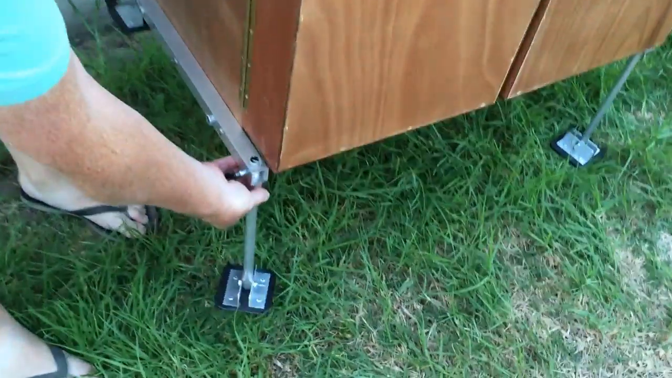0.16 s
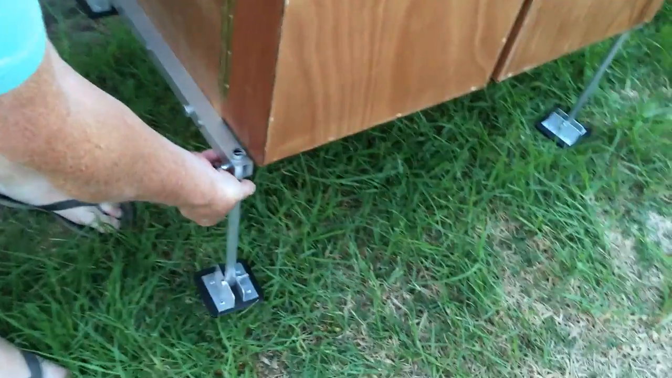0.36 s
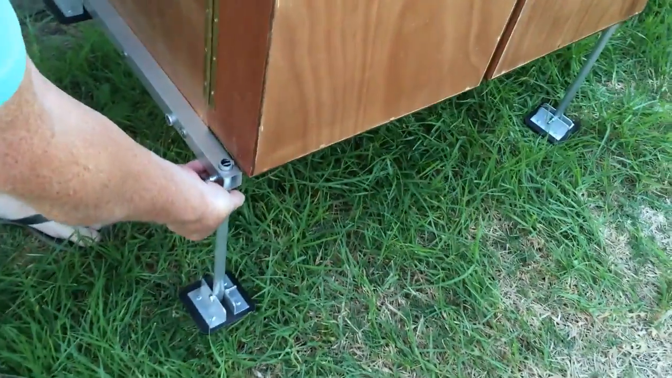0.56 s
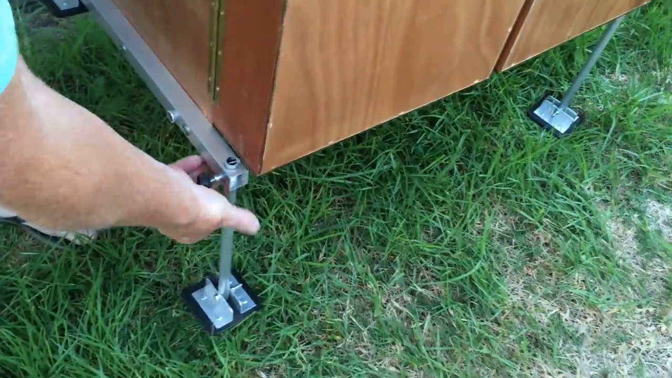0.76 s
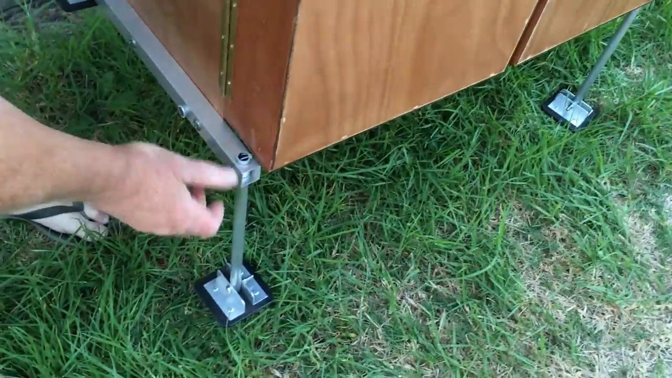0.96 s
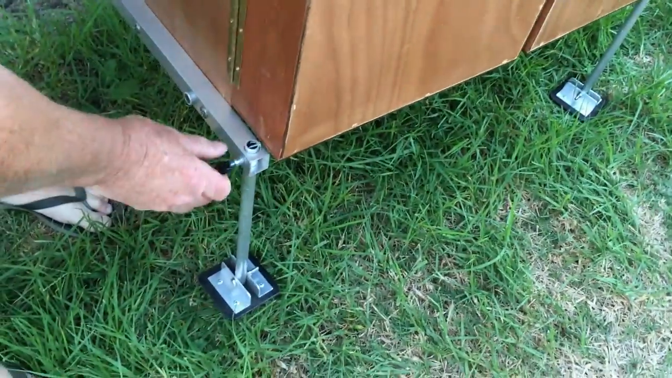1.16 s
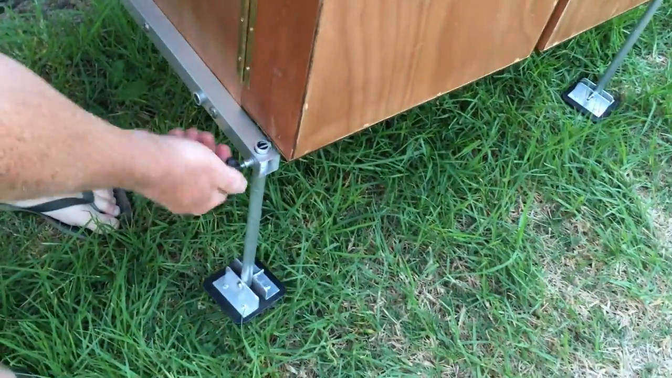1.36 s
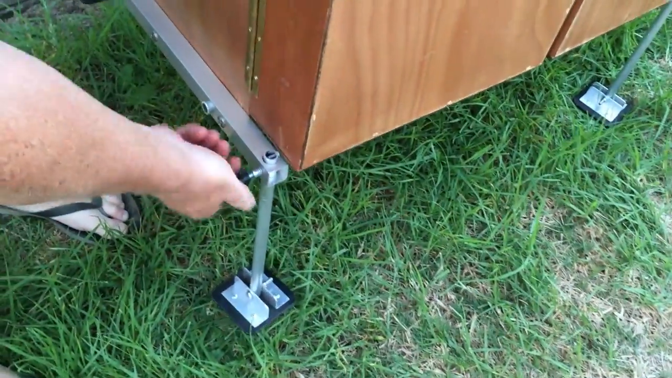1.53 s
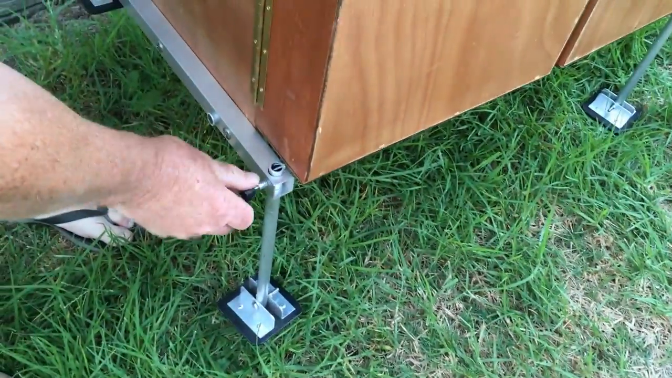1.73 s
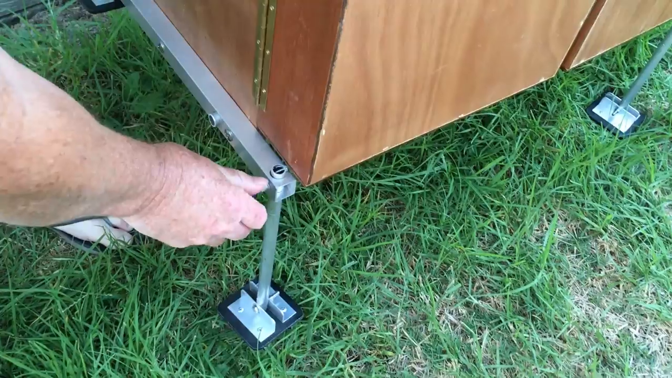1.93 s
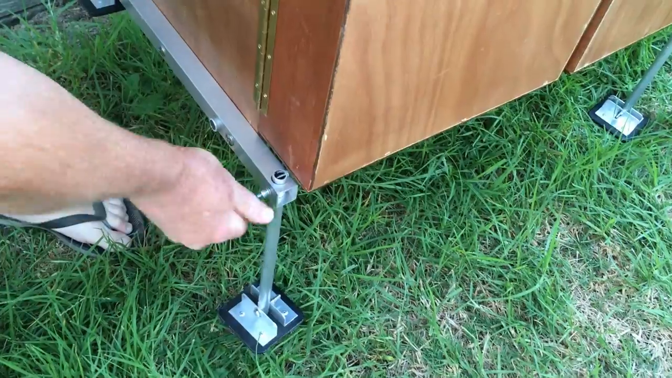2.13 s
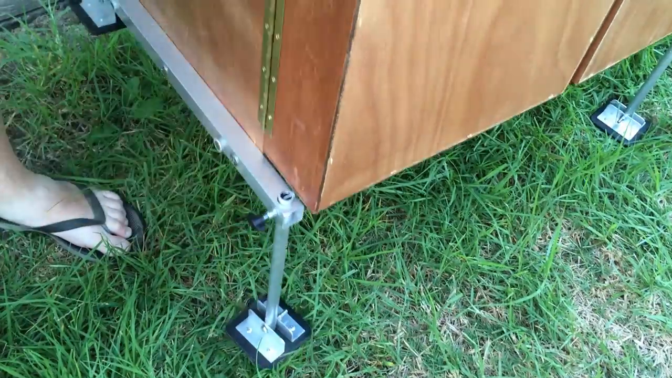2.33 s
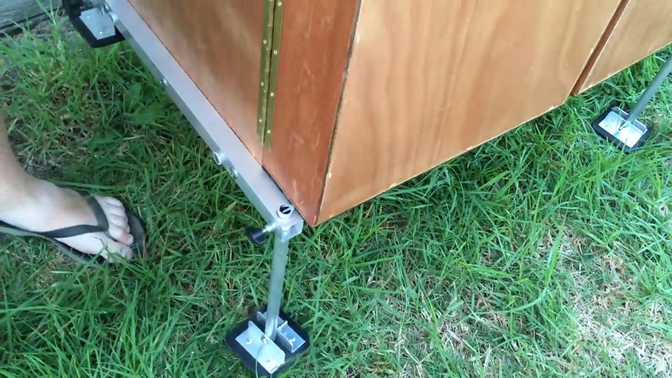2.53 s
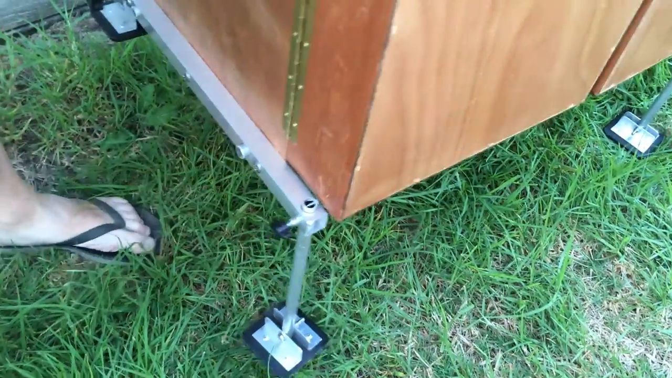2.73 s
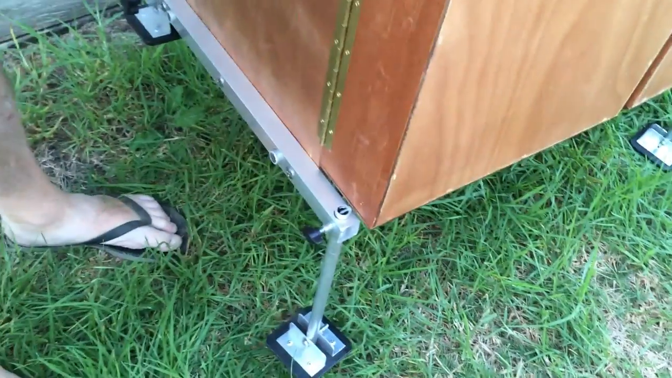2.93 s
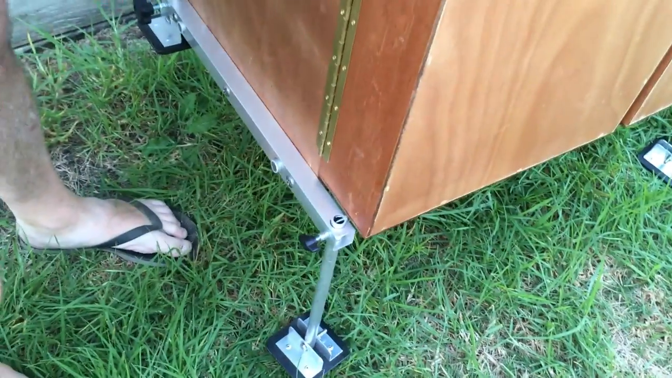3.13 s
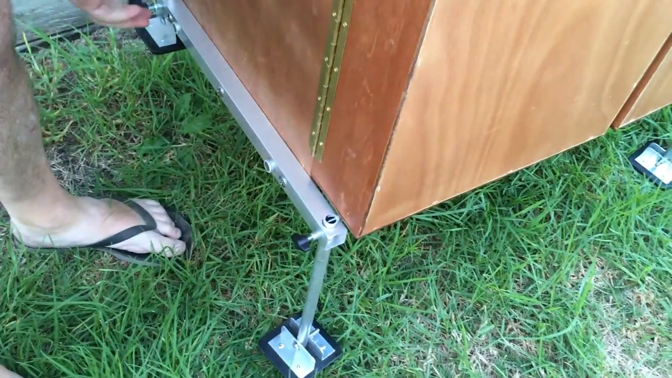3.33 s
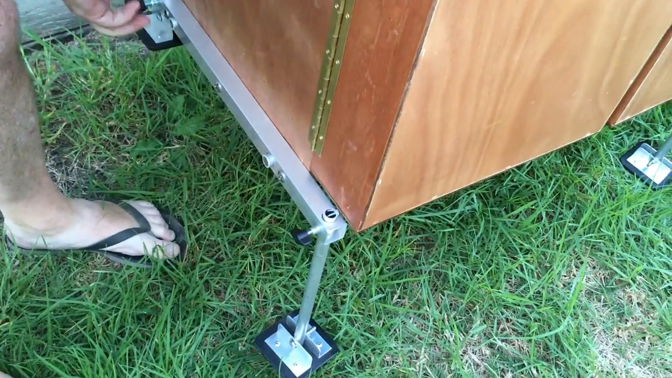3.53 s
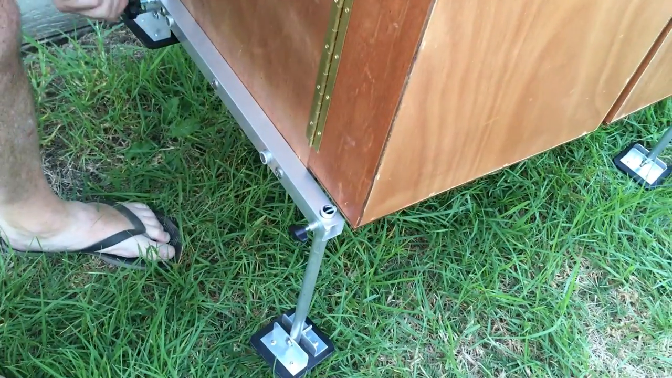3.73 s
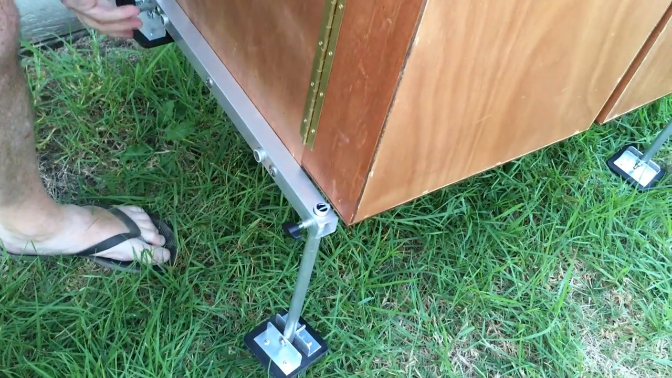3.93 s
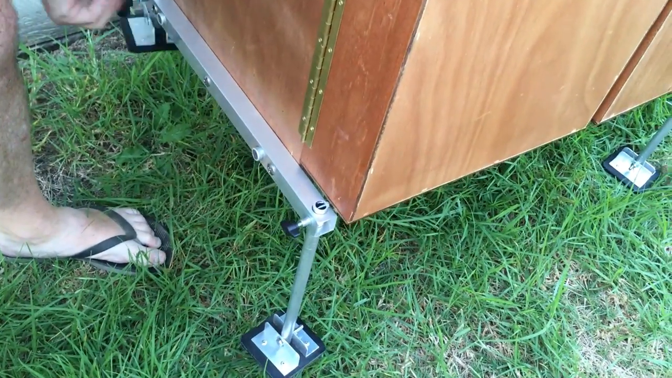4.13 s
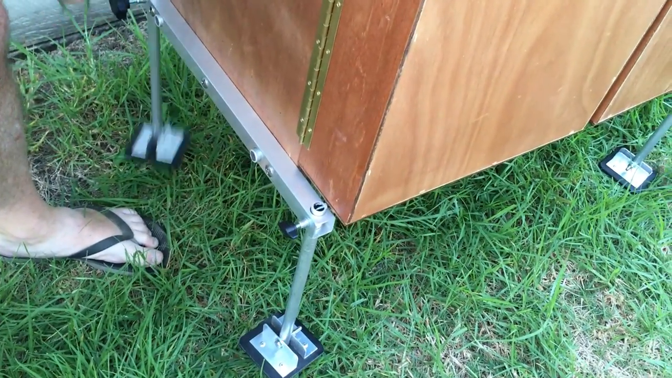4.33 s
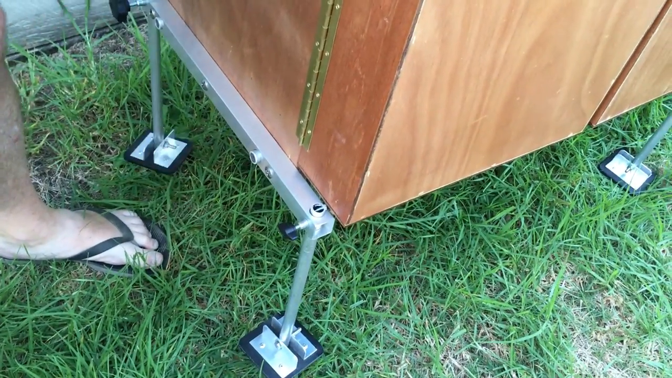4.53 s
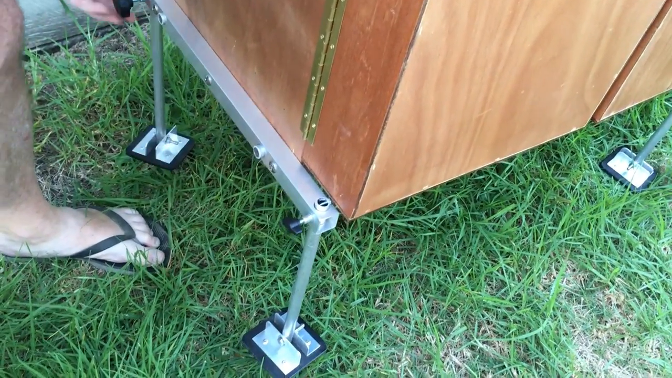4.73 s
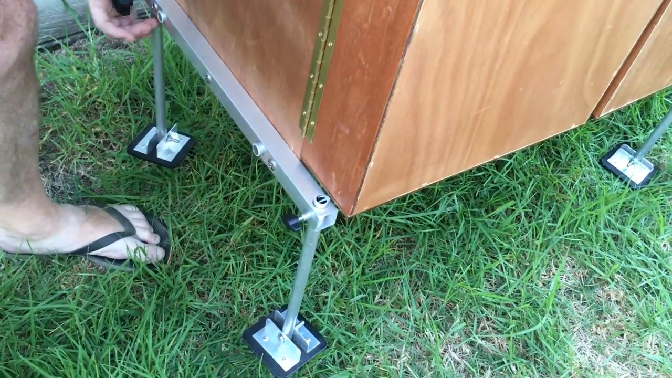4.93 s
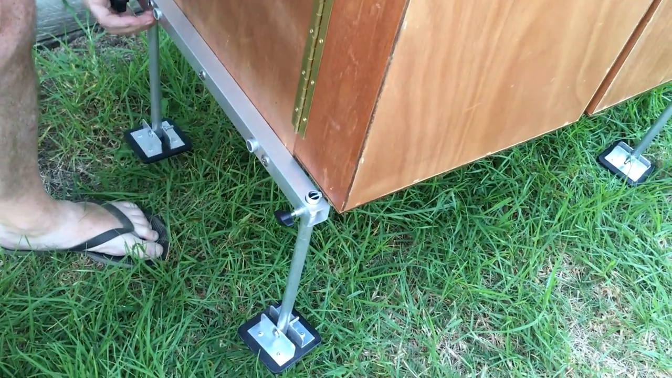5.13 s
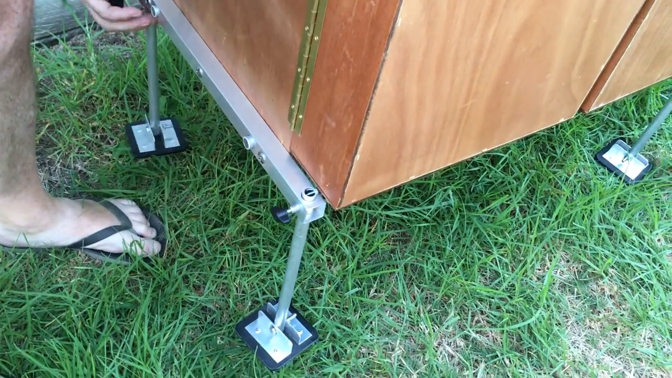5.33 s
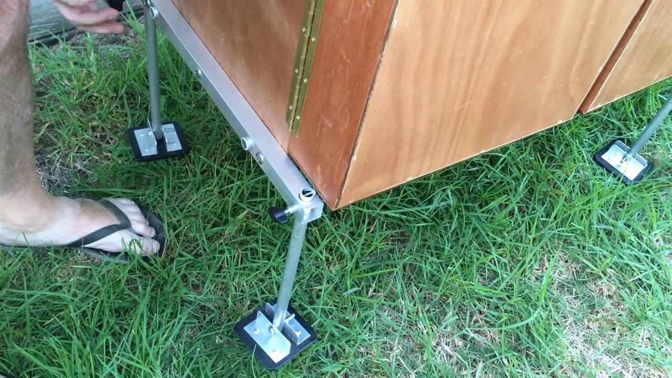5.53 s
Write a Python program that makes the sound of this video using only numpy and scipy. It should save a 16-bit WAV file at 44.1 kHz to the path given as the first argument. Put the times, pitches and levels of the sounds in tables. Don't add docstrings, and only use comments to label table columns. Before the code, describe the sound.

Someone unfolds metal legs under a wooden cabinet outdoors. Soft sandal steps, brushing grass and sparse sharp clicks come first, with thin insects and far birds barely audible. Clicks grow busier in the middle, then a leg is released, scrapes along its sleeve and hits its stop with by far the loudest clack, followed by a fast clatter and quiet handling knocks. Close, dry, mono phone sound.

```python
import sys
import numpy as np
from scipy import signal
from scipy.fft import rfft, irfft, next_fast_len
from scipy.io import wavfile
from scipy.ndimage import uniform_filter1d

SR = 44100
rng = np.random.default_rng(int(sys.argv[2]) if len(sys.argv) > 2 else 0)


def invert_db(level):
    return 10 ** (np.asarray(level, dtype=float) / 20)


def generate_wav(signal):
    frames = np.transpose(np.atleast_2d(signal))
    scaled = np.clip(frames, -1, 1) * 32767
    pcm = np.round(scaled).astype(np.int16)
    wavfile.write(sys.argv[1], SR, pcm)


N = 250488
TAIL = 5400
TOP_HZ = 15850
RELEASE_S, SLAM_S = 4.1, 4.4

# pitch_hz, level_db
RUMBLE_SPECTRUM = [(18, -14), (35, -3), (65, 1.5), (110, -7), (200, -19), (400, -42.5)]
# time_s, level_db
BREEZE = [(0.0, -63), (0.14, -63), (0.58, -56), (1.04, -58), (1.55, -53), (2.28, -62), (2.74, -55),
          (3.19, -61), (4.03, -63), (4.43, -57), (4.76, -65), (5.68, -67)]
# middle_s, half_length_s, level_db
JOLTS = [(.22, .025, -50), (.5, .06, -55), (.79, .045, -47), (1.04, .03, -56), (1.22, .03, -51),
         (1.42, .04, -47), (1.7, .05, -52), (2.25, .025, -39), (2.42, .08, -55), (2.79, .025, -47),
         (3.14, .05, -58), (4.44, .05, -45), (4.56, .03, -50), (5.18, .03, -52), (5.43, .02, -58)]
# pitch_hz, level_db
HISS_SPECTRUM = [(350, -40.5), (600, -24), (1230, -6), (1450, -9), (3780, -9), (4980, -12.5), (7110, -11),
                 (16000, -13.5)]
HISS_DB = -64
# pitch_hz, width_hz, level_db
INSECTS = [(3800, 250, -84), (7200, 200, -80), (8000, 300, -79.5), (10230, 120, -81)]
# middle_s, half_length_s, level_db
CHIRPS = [
    (.45, 0.25, -90),
    (1.35, 0.11, -90),
    (1.75, 0.26, -73),
    (3.4, 0.15, -76),
    (4.88, 0.11, -76),
    (5.45, 0.09, -86),
]

# pitch_hz, level_db
GRASS_SPECTRUM = [(300, -71), (1200, -2.5), (3000, -4), (7000, -5), (12000, -7), (16000, -18)]
# middle_s, half_length_s, level_db
SWISHES = [
    (0.208, 0.029, -57.5),
    (0.302, .02, -53),
    (0.456, 0.11, -64.5),
    (1.108, 0.032, -60.5),
    (2.43, .025, -57.5),
    (2.666, 0.06, -59),
    (2.74, 0.039, -53.5),
    (2.894, 0.047, -62.5),
    (5.113, 0.013, -65),
]
# pitch_hz, level_db
SHUFFLE_SPECTRUM = [(80, -27.5), (170, 3), (350, 6), (850, 1), (1500, -15.5), (3000, -36)]
SHUFFLE_DB = -66.5
# middle_s, half_length_s, level_db
SHIFTS = [(.24, .04, -62), (.44, .03, -58), (1.12, .03, -63), (1.43, .02, -67), (1.89, .02, -70),
          (2.26, .03, -57), (2.42, .06, -60), (2.62, .04, -58), (2.73, .02, -52), (3.17, .06, -63),
          (3.4, .12, -64), (4.03, .04, -58), (4.18, .02, -41), (4.47, .03, -43), (4.58, .03, -38),
          (4.72, .06, -66), (5.15, .1, -61)]
# start_s, peak_db, slap_db, pitch_hz, ring_s (time to fade by 60 dB)
THUDS = [
    (0.1811, -21.5, -22, 190, 0.12),
    (1.403, -30.5, -35, 170, 0.083),
    (2.2218, -21, -14.5, 190, 0.13),
    (2.6981, -19.5, -13, 190, 0.1),
    (3.702, -41.5, -20, 245, 0.26),
    (3.766, -46, -12, 250, 0.15),
    (4.412, -24, -16.5, 100, 0.28),
    (4.591, -42, -30, 150, .12),
    (5.146, -53, -20, 105, 0.26),
]
# start_s, peak_db, pitch_hz, ring_s
PANEL_HUMS = [(.192, -44, 280, .1), (2.233, -35, 277, .1), (2.54, -50, 390, .1), (2.575, -49, 380, .08),
              (2.712, -37, 290, .09), (3.702, -46, 262, .12), (3.725, -47, 270, .1),
              (3.7675, -36, 250, .13), (4.17, -35, 231, .14), (4.412, -17, 307, .13), (4.41, -16, 553, .1),
              (4.49, -17, 570, .06), (4.53, -26, 350, .12), (4.553, -27, 560, .1)]

# pitch_hz, level_db, ring_s
RATTLE_NOTES = [(2240, -1, 0.2), (2660, -7, .08), (3500, -4.5, 0.092), (4850, -4, 0.12), (5200, -5.5, .08),
                (7300, -5.5, 0.073), (10300, -9, .06)]
# time_s, tube_db, cabinet_db
SLIDES = [
    [(4.16, -57, -33.5), (4.24, -62, -48.5), (4.34, -52, -50)],
    [(4.34, -43.5, -52.5), (4.38, -44, -50), (4.45, -47, -56.5), (4.48, -45, -54)],
    [(4.5, -60, -44), (4.594, -64, -60), (4.68, -67, -69)],
]

# pitch_hz, level_db, ring_s
CABINET_NOTES = [(250, -15.5, 0.17), (307.3, -3, 0.15), (386, -5.5, 0.076), (463, -9.5, 0.051),
                 (553.8, -3, 0.18), (643, 2.5, 0.081), (848, 2, .11), (968.6, 1.5, 0.048),
                 (1082, -7, 0.023), (1290, -8.5, .09), (1410, 1, 0.094)]
# pitch_hz, level_db, ring_s
TUBE_NOTES = [(1800, -2.5, 0.12), (2206, -4, 0.2), (2417, -2.5, 0.16), (2650, -0.5, 0.089),
              (3040, -6.5, 0.26), (3600, -2, 0.11), (3850, -7, 0.055), (4260, -13.5, 0.063),
              (5060, -11.5, 0.08), (5790, -17.5, 0.024)]
# pitch_hz, level_db, ring_s
FAR_LEG_NOTES = [(829, -10, .14), (888, -10, .12), (1300, -3, .12), (1430, -5, .09), (1707, -7, .1),
                 (2235, -1, .22), (2440, -7, .12), (2664, -4, .1), (3040, -4, .12), (3500, -5, .12),
                 (3900, -5, .07), (4650, -9, .2), (4958, -10, .13), (5584, -9, .1)]
# pitch_hz, level_db, ring_s
CLAMP_NOTES = [(6846, -8, 0.02), (7590, -2, .08), (7730, -5, 0.096), (8620, -5.5, 0.043), (9284, -4, .04),
               (11240, -17, 0.019)]
# start_s, tube_db, cabinet_db, tick_db, metal_hz
CLICKS = [(0.411, -33, -45, -43, 3130), (0.4176, -32, -32, -43, 1340), (1.0774, -38, -48, -29, 9300),
          (1.0815, -39, -52, -29, 7400), (1.1178, -49, -48, -48, 3300), (1.1315, -43, -48, -46, 7800),
          (2.396, -30, -35, -35, 1650), (2.412, -42, -44, -52, 1750), (2.43, -48, -52, -58, 3400),
          (2.5909, -30, -31, -33, 1450), (2.606, -42, -42, -52, 1640), (2.674, -43, -48, -70, 1800),
          (3.2235, -31, -33, -55, 1780), (3.231, -42, -42, -60, 1800), (3.2965, -43, -44, -62, 2950),
          (3.299, -42, -55, -66, 2100), (3.3, -46, -58, -60, 5370), (3.305, -45, -55, -62, 3150),
          (3.4441, -28, -32, -46, 1830), (3.701, -53, -48, -56, 2850), (4.032, -31, -31, -40, 1890)]
CLICK_WOOD_HZ = 560
# start_s, tube_db, cabinet_db, wood_hz
FUMBLES = [(.4649, -45, -43, 654), (.6695, -52, -52, 1200), (1.0801, -54, -39, 833), (1.86, -50, -51, 413),
           (2.2, -50, -55, 940), (1.3, -62, -54, 700), (1.5, -58, -56, 1150), (1.7, -62, -55, 800),
           (2.02, -62, -54, 830), (2.35, -57, -50, 820), (2.475, -60, -50, 760), (2.85, -62, -53, 920),
           (3.05, -66, -54, 450), (3.5, -66, -53, 380), (2.6689, -58, -35.5, 324), (3.09, -64, -53.5, 403),
           (3.156, -57, -49, 370), (3.41, -70, -53, 574), (3.5994, -74, -50, 554), (3.716, -50, -43, 520),
           (3.7571, -36, -34, 241), (3.848, -69, -52, 247), (4.0125, -53, -41, 280), (4.044, -41, -35, 800),
           (4.133, -54, -39, 517), (4.86, -59, -54.5, 400), (5.054, -49, -49, 584), (5.0761, -46, -46, 420),
           (5.095, -50, -47, 400), (5.112, -54, -48, 378), (5.1272, -48, -45, 330), (5.1436, -48, -42, 312),
           (5.2205, -52, -41, 830), (5.2394, -60, -46, 826), (5.3266, -59, -54, 490),
           (5.3865, -50, -46, 339)]
FUMBLE_METAL_HZ, FUMBLE_TICK_DB = 1430, -13
# start_s, tube_db, cabinet_db, tick_db, metal_hz
DROP = [(4.147, -41, -33.5, -47, 4900), (4.1595, -19, -15.5, -28, 1320), (4.172, -26, -22.5, -38, 2440),
        (4.2219, -36, -35.5, -46.5, 1330), (4.235, -44, -44.5, -59, 2400), (4.192, -34, -28, -52, 1430),
        (4.2728, -47, -47, -45, 7300), (4.282, -50, -52, -49, 10300), (4.2937, -38, -45, -36, 7400),
        (4.329, -46, -50, -44, 5060), (4.3401, -38, -48, -33, 7400), (4.349, -39, -48, -38, 5000),
        (4.382, -24, -27, -21, 5770), (4.39, -22, -27, -21, 6800), (4.3979, -8, -16, -9, 3850),
        (4.4067, -3, -5, 0.1, 1260), (4.4124, -4, -4, -18.5, 1420), (4.421, -19, -16, -24, 2245),
        (4.433, -25, -23.5, -26, 2900), (4.443, -30, -28, -31, 3500), (4.463, -33, -30, -35, 3040),
        (4.452, -27, -30, -40, 2235), (4.4855, -14, -14, -17, 1430), (4.4905, -16, -13, -24, 2700),
        (4.5242, -34, -28, -34, 3070), (4.53, -21, -21, -22, 4300)]
HANGING_WOOD_HZ, STOPPED_WOOD_HZ = 870, 560
# first_s, first_gap_s, gap_ratio, first_tube_db, change_db per contact
SKID = (4.362, .0047, .9, -31, 3.6)
SKID_CABINET_DB, SKID_TICK_DB, SKID_METAL_HZ = -9, 4, 5300
# first_s, first_gap_s, gap_ratio, first_tube_db, change_db per contact
BOUNCE = (4.5271, .0222, .78, -22, -3.1)
BOUNCE_CABINET_DB, BOUNCE_TICK_DB, BOUNCE_METAL_HZ = 2, -4.5, 2240
SOFT_HZ, SOFT_DB_PER_OCTAVE = 9000, 14

# middle_s, half_length_s, from_hz, share_lost
THIN_MOMENTS = [(.633, .008, 1500, .55), (.865, .007, 3000, .5), (1.052, .012, 1500, .8),
                (1.236, .009, 1500, .7), (1.283, .009, 1500, .7), (1.797, .009, 1500, .7),
                (2.18, .02, 1200, .6), (2.63, .01, 3000, .5), (3.21, .008, 1900, .7),
                (3.515, .01, 2000, .45), (3.722, .008, 3500, .6), (4.154, .003, 2000, .9),
                (4.312, .017, 2800, .5), (4.313, .015, 11500, 1.), (4.29, .005, 9000, .6),
                (4.336, .003, 9000, .7)]


def level(x, db):
    return x * invert_db(db) / np.sqrt(np.mean(x ** 2))


def band(x, lo_hz, hi_hz):
    limits = [lo_hz, min(hi_hz, .45 * SR)]
    return signal.sosfilt(signal.butter(2, limits, "band", fs=SR, output="sos"), x)


def coloured(x, spectrum):
    hz, db = np.transpose(spectrum)
    size = next_fast_len(N)
    f = np.arange(size // 2 + 1) * SR / size + 1
    gain = invert_db(np.interp(np.log(f), np.log(hz), db, -90, -90))
    return level(irfft(rfft(x, size) * gain, size)[:N], 0)


def walk(rate):
    k = int(SR / rate)
    steps = np.repeat(rng.standard_normal(N // k + 1), k)
    return uniform_filter1d(uniform_filter1d(steps, k), k)[:N]


def curve(spans, column):
    t = np.arange(N) / SR
    gain = np.zeros(N)
    for rows in spans:
        rows = np.array(rows)
        gain += invert_db(np.interp(t, rows[:, 0], rows[:, column], -150, -150))
    return uniform_filter1d(gain, size=200)


def swells(rows):
    t = np.arange(0, N + 64, 64) / SR
    gain = sum(invert_db(db) * np.exp(-.5 * ((t - s) / half) ** 2) for s, half, db in rows)
    return np.interp(np.arange(N) / SR, t, gain)


def grains(spread_db):
    return rng.standard_normal(N) * invert_db(spread_db * np.minimum(rng.exponential(size=N), 6))


def ring(notes, scatter_db, detune, damp):
    hz, db, ring_s = np.transpose(notes)[:, :, None]
    pitch_chance, level_chance = rng.standard_normal((2, len(notes), 1))
    t = np.arange(TAIL) / SR
    waves = np.sin(2 * np.pi * hz * (1 + detune * pitch_chance) * t)
    fade = invert_db(-60 * t / (ring_s * damp))
    return np.sum(invert_db(db + scatter_db * level_chance) * waves * fade, axis=0)


def haze(lo_hz, hi_hz, ring_s, db):
    fade = invert_db(db - 60 * np.arange(TAIL) / SR / ring_s)
    return band(rng.standard_normal(TAIL), lo_hz, hi_hz) * fade


def add(out, s, sound, peak_db):
    i = int(s * SR)
    n = min(len(sound), N - i)
    faded = sound * np.minimum(np.linspace(4, 0, len(sound)), 1)
    out[i:i + n] += faded[:n] * invert_db(peak_db) / np.max(np.abs(sound))


def air():
    gusts = curve([BREEZE], column=1) + swells(JOLTS)
    rumble = coloured(rng.standard_normal(N), RUMBLE_SPECTRUM) * invert_db(2 * walk(14)) * gusts
    hiss = level(coloured(rng.standard_normal(N), HISS_SPECTRUM) * invert_db(.9 * walk(7.1)), HISS_DB)
    chirring = np.zeros(N)
    for hz, width_hz, db in INSECTS:
        pulse = invert_db(5 * np.clip(walk(5), -2, 1) - .7 * np.arange(N) / SR)
        insect = band(rng.standard_normal(N), hz - width_hz / 2, hz + width_hz / 2)
        chirring += level(insect * pulse, db)
    return rumble + hiss + chirring


def birds():
    whistles = np.zeros(N)
    for hz in (2900, 3170, 3750, 4100):
        tone = np.sin(2 * np.pi * np.cumsum(hz * (1 + .025 * walk(9.6))) / SR)
        whistles += tone * walk(240) * invert_db(4 * np.clip(walk(11), -2, 1))
    return level(whistles, 0) * swells(CHIRPS)


def lawn():
    swish = coloured(grains(2.2), GRASS_SPECTRUM) * invert_db(1.9 * walk(77)) * swells(SWISHES)
    shuffle = coloured(grains(5.3) * invert_db(4 * walk(45)), SHUFFLE_SPECTRUM)
    return swish + shuffle * (invert_db(SHUFFLE_DB) + swells(SHIFTS))


def thuds():
    out, t = np.zeros(N), np.arange(TAIL) / SR
    parts = [(.65, -2, .69), (1, -3, 1), (1.45, -3, 1), (2.1, -8, .79), (2.85, -9, .7), (3.5, -13, .6), (4.5, -16, .5)]
    for s, db, slap_db, hz, ring_s in THUDS:
        sole = ring([(r * hz, part_db, k * ring_s) for r, part_db, k in parts], 0, 0, damp=0.77)
        push = -np.sin(2 * np.pi * hz * t) * invert_db(13.5 - 60 * t / 0.019)
        add(out, s, band(push + sole, 59, 1500), db)
        add(out, s, haze(400, 1400, .08, 0), db + slap_db)
    return out


def panel():
    out, t = np.zeros(N), np.arange(TAIL) / SR
    for s, db, hz, ring_s in PANEL_HUMS:
        hum = ring([(hz, 0, ring_s), (2.05 * hz, -14, .6 * ring_s)], 0, 0, 1)
        add(out, s, hum * (1 - np.exp(-t / .003)), db)
    return out


def slide():
    tap = 1. * (np.arange(TAIL) == 0)
    tube = ring(RATTLE_NOTES, 0, 0, 1) + invert_db(28.5) * band(tap, 1500, 14000)
    cabinet = ring(CABINET_NOTES, 0, 0, 0.54)
    metal = level(signal.fftconvolve(grains(2.5), tube)[:N], 0)
    wood = level(signal.fftconvolve(grains(4.6), cabinet)[:N], 0)
    return metal * curve(SLIDES, column=1) + wood * curve(SLIDES, column=2)


def series(rule, cabinet_db, tick_db, metal_hz, wood_hz, count):
    first_s, gap_s, ratio, first_db, step_db = rule
    rows = []
    for i in range(count):
        s = first_s + gap_s * (1 - ratio ** i) / (1 - ratio)
        db = first_db + step_db * i
        rows.append((s, db, db + cabinet_db, db + tick_db, metal_hz, wood_hz))
    return rows


def contacts():
    drop = [(*row, HANGING_WOOD_HZ if row[0] < SLAM_S else STOPPED_WOOD_HZ) for row in DROP]
    skid = series(SKID, SKID_CABINET_DB, SKID_TICK_DB, SKID_METAL_HZ, HANGING_WOOD_HZ, count=5)
    bounce = series(BOUNCE, BOUNCE_CABINET_DB, BOUNCE_TICK_DB, BOUNCE_METAL_HZ, STOPPED_WOOD_HZ, count=6)
    clicks = [(*row, CLICK_WOOD_HZ) for row in CLICKS]
    fumbles = [(s, tube_db, cabinet_db, tube_db + FUMBLE_TICK_DB, FUMBLE_METAL_HZ, wood_hz)
               for s, tube_db, cabinet_db, wood_hz in FUMBLES]
    return drop + skid + bounce + clicks + fumbles


def knocks():
    out, t = np.zeros(N), np.arange(TAIL) / SR
    tap = 1. * (t == 0)
    shape = (1 - np.exp(-t / 0.0013)) * np.exp(-t / 0.0031)
    shape = shape + invert_db(-19) * np.exp(-t / 0.025) * (1 - np.exp(-t / 0.0014))
    swing = 1 - np.exp(-t / .0018)
    tube_crack = invert_db(35) * band(tap, 1100, 5200)
    clamp_crack = invert_db(32) * band(tap, 5500, 15000)
    cabinet_crack = invert_db(34) * band(tap, 400, 1500)
    for s, tube_db, cabinet_db, tick_db, metal_hz, wood_hz in contacts():
        released = s > RELEASE_S
        chatter = rng.standard_normal(TAIL) * invert_db(1.4 * rng.exponential(size=TAIL)) * shape
        chatter = chatter + invert_db(13.5) * (np.arange(TAIL) == 40)
        clamp_chatter = chatter * np.exp(-t / .035)

        metal_ring_s = .036 * min(1, (3000 / metal_hz) ** .5)
        metal_note = swing * ring([(metal_hz, -10.5 - .3 * tube_db, metal_ring_s)], 0, .012, 1)
        wood_note = swing * ring([(wood_hz, -10.5 - .17 * cabinet_db, .06)], 0, .03, 1)
        tube_note = metal_note * (metal_hz < 6000)
        clamp_note = invert_db(-5) * metal_note * (metal_hz >= 6000)

        pipe = ring(FAR_LEG_NOTES, 2.5, .006, .55) if released else ring(TUBE_NOTES, 2, 0.014, .3)
        dull_hz = SOFT_HZ * 2 ** ((tick_db - tube_db) / SOFT_DB_PER_OCTAVE)
        dull_hz = np.clip(dull_hz, 6000 if released else 2600, 16000)
        tube = band(pipe + haze(1300, 4800, 0.036, 18) + tube_crack, 600, dull_hz)
        cabinet = ring(CABINET_NOTES, 2.7, 0.019, .6) + haze(300, 1500, 0.072, 18.5) + cabinet_crack
        cabinet = band(cabinet, 280, 2100)
        clamp = ring(CLAMP_NOTES, 2, .01, .6) + haze(3800, 11000, 0.021, 25) + clamp_crack

        for push, body, note, db in ((chatter, tube, tube_note, tube_db),
                                     (chatter, cabinet, wood_note, cabinet_db),
                                     (clamp_chatter, clamp, clamp_note, tick_db)):
            sound = signal.fftconvolve(push, body)[:TAIL]
            add(out, s - .001, sound / np.max(np.abs(sound)) + note, float(db))
    return out


def scene():
    return (air() + birds() + lawn() + thuds() + panel() + slide() + knocks())[None]


def thin_treble(x):
    hz, t, z = signal.stft(x, SR, nperseg=512, noverlap=384)
    usual = np.median(np.abs(z), axis=1)
    for s, half, from_hz, lost in THIN_MOMENTS:
        now = np.abs(t - s) < half
        strength = uniform_filter1d(np.mean(np.abs(z[:, now]), axis=1) / usual, size=3)
        treble = (hz > from_hz) & (hz < TOP_HZ)
        weak = treble & (strength < np.quantile(strength[treble], lost))
        z[np.ix_(weak, now)] = 0
    return signal.istft(z, SR, nperseg=512, noverlap=384)[1][:N]


def band_limit(x):
    return signal.sosfilt(signal.butter(12, 16490, fs=SR, output="sos"), x)


def record(dry):
    rounded = np.tanh(dry[0] / .95) * .95
    top_cut = signal.ellip(8, .2, 45, TOP_HZ, fs=SR, output="sos")
    mix = thin_treble(signal.sosfilt(top_cut, rounded))[None]
    return band_limit(mix)


dry = scene()
out = record(dry)
generate_wav(out)
```